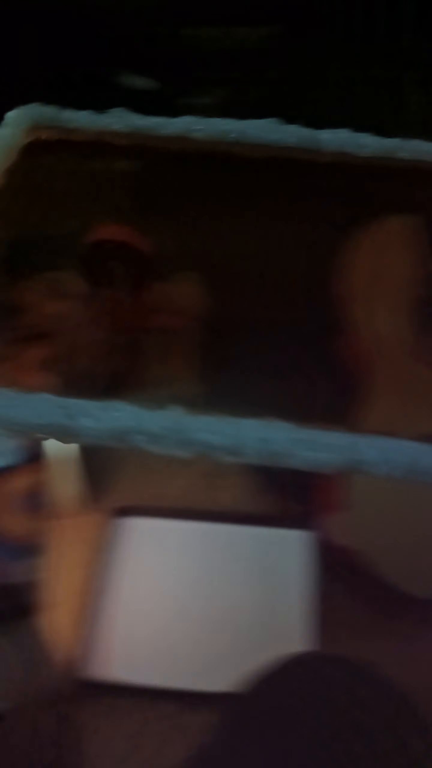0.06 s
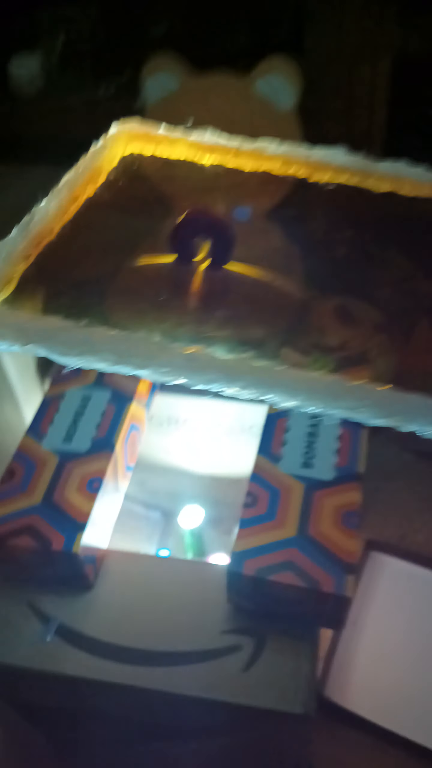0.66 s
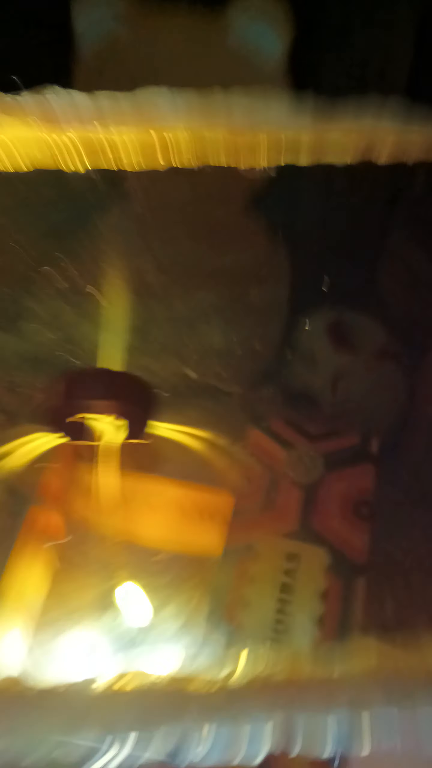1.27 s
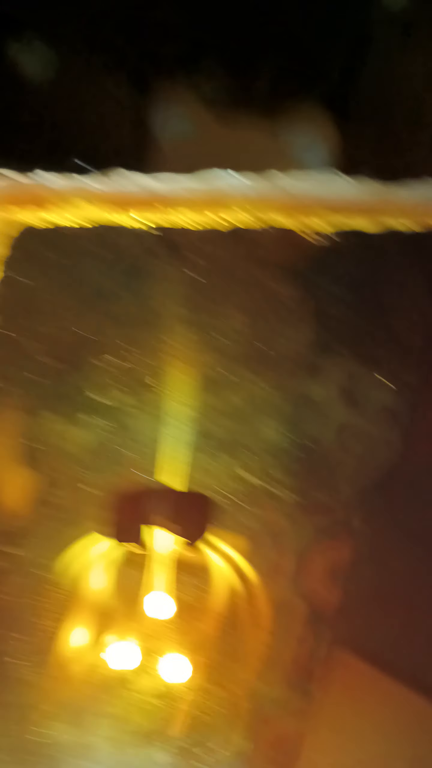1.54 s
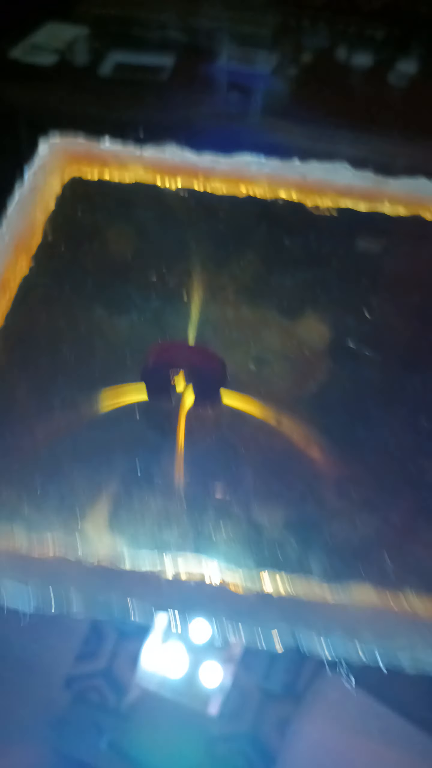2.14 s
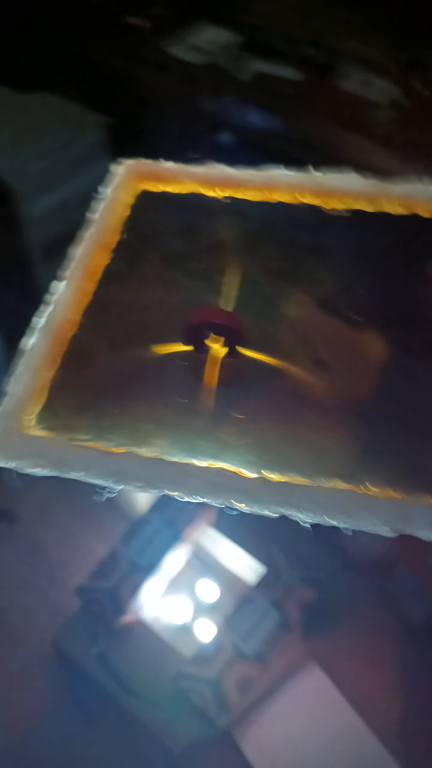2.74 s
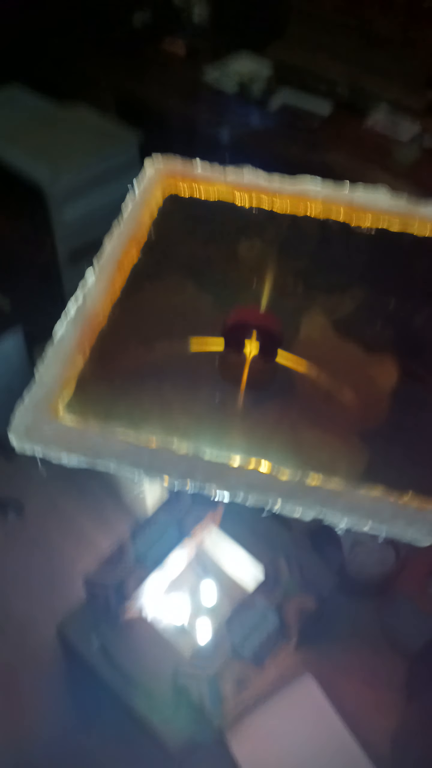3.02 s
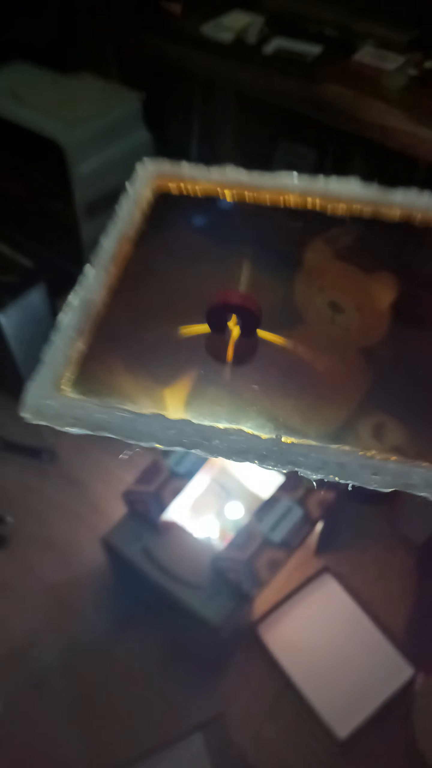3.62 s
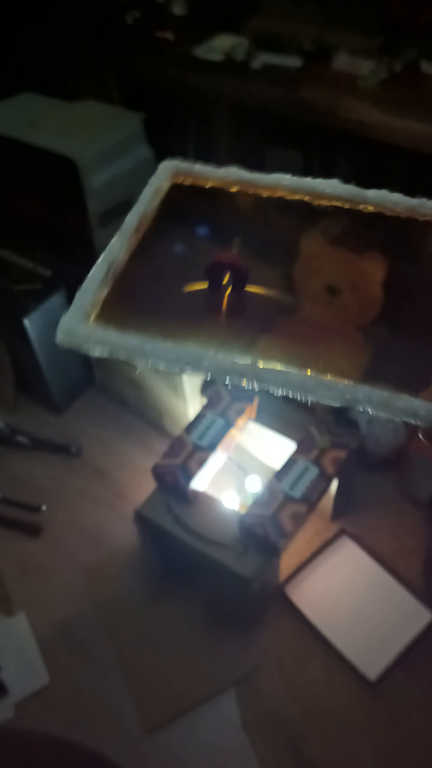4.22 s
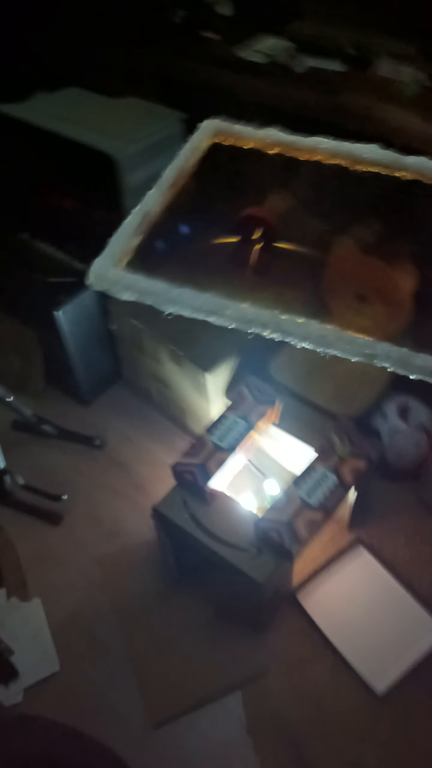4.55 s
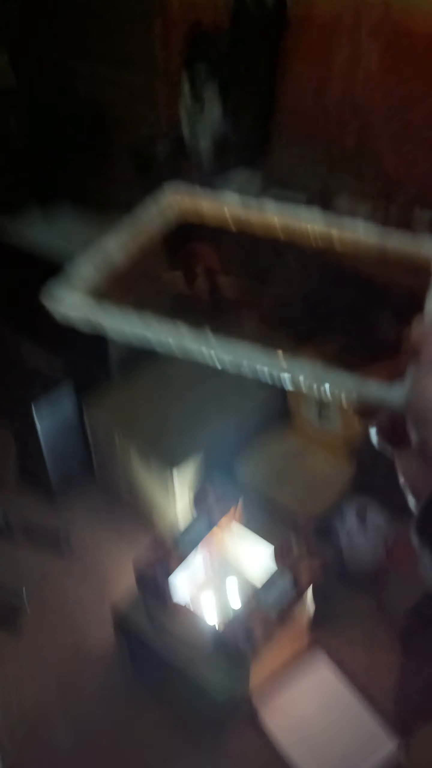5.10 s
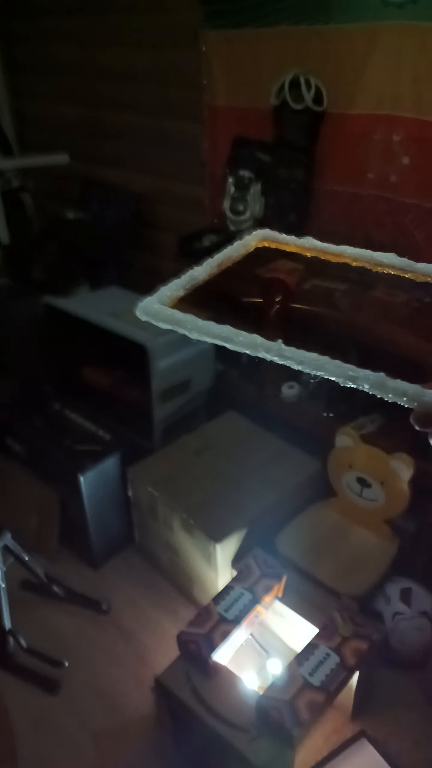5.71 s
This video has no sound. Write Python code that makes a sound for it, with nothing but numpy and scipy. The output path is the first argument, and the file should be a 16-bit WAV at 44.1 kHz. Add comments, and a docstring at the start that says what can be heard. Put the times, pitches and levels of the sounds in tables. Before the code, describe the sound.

A hand rustles over taped plastic with dry ticks, then a soft thud and a box set down hard in a quiet room.

```python
"""Faint hush of a small room at night, then a hand sliding close by over a taped plastic pane.
Tiny friction slips make its fizz, scrape and rub; the plastic snaps in dry ticks.
The floorboards thud softly. A boxy object is set down hard, rings, rocks and settles; a low hum
lingers and a few small bumps follow. The near sounds sit to the left; the room answers briefly."""
import sys
import numpy as np
from scipy import signal
from scipy.fft import rfft, irfft, next_fast_len
from scipy.io import wavfile
from scipy.ndimage import map_coordinates

SR = 44100
rng = np.random.default_rng(int(sys.argv[2]) if len(sys.argv) > 2 else 0)


def pcm_store(signal):
    """Save signal as 16-bit PCM."""
    levels = np.round(np.clip(np.atleast_2d(signal), -1, 1) * 32767)
    wavfile.write(sys.argv[1], SR, levels.astype(np.int16).T)


N = 258867
TIME_S = np.arange(N) / SR
EVENT_S = np.arange(SR * 3 // 4) / SR  # time axis of one event


def amp(db):
    """Decibels to gain."""
    return 10 ** (np.asarray(db) / 20)


def curve_at(points, hz):
    """Interpolate (freq_hz, value) points on a log frequency axis."""
    freqs_hz, values = np.transpose(points)
    return np.interp(np.log(hz + 1), np.log(freqs_hz + 1), values)


def filtered(x, response):
    """Apply response(hz) by FFT."""
    n = x.shape[-1]
    size = next_fast_len(n + 8192)
    return irfft(rfft(x, size) * response(np.fft.rfftfreq(size, 1 / SR)), size)[..., :n]


def coloured(x, spectrum):
    """Apply a minimum-phase, unit-energy filter shaped like the spectrum."""
    size = 4096
    gain_db = np.maximum(curve_at(spectrum, np.fft.rfftfreq(size, 1 / SR)), -80)
    cepstrum = irfft(np.log(amp(gain_db)))
    causal_fold = np.r_[1, np.full(size // 2 - 1, 2), 1, np.zeros(size // 2 - 1)]
    impulse = irfft(np.exp(rfft(cepstrum * causal_fold)))
    impulse /= np.linalg.norm(impulse)
    return signal.fftconvolve(x, impulse[None], axes=1)[:, :x.shape[1]]


def stereo(noise_pair, spectrum, coherence):
    """Two independent noises to a coloured, partly coherent left and right; mid rms 1."""
    def mid_side_gains(hz):
        angle = np.arccos(np.clip(curve_at(coherence, hz), -1, 1)) / 2
        return amp(curve_at(spectrum, hz)) * [np.cos(angle), np.sin(angle)]
    mid, side = filtered(noise_pair, mid_side_gains)
    return np.array([mid + side, mid - side]) / np.std(mid)


def panned(x, balance):
    """Constant-power pan by frequency."""
    def channel_gains(hz):
        left_over_right_db = curve_at(balance, hz)
        mean_power = np.cosh(np.log(amp(left_over_right_db)))
        return amp(np.outer([0.5, -0.5], left_over_right_db)) / np.sqrt(mean_power)
    return filtered(x, channel_gains)


def add(track, start_s, sound):
    """Mix a sound in at start_s."""
    part = track[:, round(start_s * SR):][:, :sound.shape[-1]]
    part += sound[..., :part.shape[-1]]


# Noise floor: freq_hz, density_db
HUSH_SPECTRUM = [(15, -54), (25, -56), (53, -8.5), (123, -1.5), (216, -5), (352, -7), (382, -8), (542, -10),
                 (587, -9.5), (749, -12.5), (881, -13), (1680, -18), (5820, -23.5), (8730, -22.5),
                 (15800, -29.5)]
# Left-right likeness of the hush: freq_hz, coherence
HUSH_COHERENCE = [(100, 0.25), (1000, 0)]
# Pan of the hush: freq_hz, left_over_right_db
HUSH_BALANCE = [(60, 12.5), (180, 3.5), (550, 1), (1650, 1.0), (4970, 1), (15000, 1)]
def room_hush():
    """Still air and microphone hiss: steady coloured noise."""
    noise = stereo(rng.standard_normal((2, N)), HUSH_SPECTRUM, HUSH_COHERENCE)
    return amp(-63) * panned(noise, HUSH_BALANCE)


# Left-right likeness of friction and room echo: freq_hz, coherence
NEAR_COHERENCE = [(100, 0.68), (300, 0.9), (700, 0.69), (1500, 0.25), (3000, 0)]
def friction(spectrum, slips_per_s, spread_db, smooth_gain):
    """Tiny slips of uneven size over smooth rubbing noise."""
    slips = (rng.random(N) < slips_per_s / SR) * rng.standard_normal((2, N))
    slips *= amp(spread_db * np.minimum(rng.exponential(size=N), 4))
    slips /= np.sqrt(np.mean(slips ** 2) + 1e-20)
    return stereo(slips + smooth_gain * rng.standard_normal((2, N)), spectrum, NEAR_COHERENCE)


# Hand strokes, relative levels: start_s, length_s, fade_s, fizz_db, scrape_db, rub_db
HAND_STROKES = [(0.599, 0.26, 0.1, -66, -71.5, -62.5), (0.811, 0.078, 0.079, -45.5, -52, -64),
                (0.901, 0.081, 0.07, -47.5, -54, -57), (1.004, 0.18, 0.22, -55.5, -63, -53.5),
                (1.203, 0.11, 0.21, -53.5, -62, -65), (1.37, 0.05, 0.17, -63, -65.5, -74),
                (1.5, 0.69, 0.2, -67, -75.5, -75), (2.137, 0.08, 0.47, -59.5, -64, -75),
                (2.22, 0.077, 0.18, -67, -53.5, -58.5), (2.42, 0.43, 0.65, -72, -77.5, -77),
                (3.352, 0.045, 0.25, -66.5, -74, -77), (3.787, 0.027, 0.14, -61.5, -61, -68),
                (3.937, 0.26, 0.13, -69.5, -70.5, -76), (4.535, 0.04, 0.12, -59.5, -70, -80),
                (4.98, 0.027, 0.18, -60.5, -73, -80)]
def stroke_envelopes(attack_s=0.025):
    """Fizz, scrape and rub gains: each stroke speeds up, holds, then falls 20 dB per fade_s."""
    power = np.zeros((3, N))
    for start_s, length_s, fade_s, *levels_db in HAND_STROKES:
        attack = np.clip((TIME_S - start_s) / attack_s, 0, 1)
        release = amp(-20 * np.maximum(TIME_S - start_s - length_s, 0) / fade_s)
        power += np.outer(amp(levels_db), attack * release) ** 2
    return np.sqrt(power)


# High, middle and low friction bands: freq_hz, density_db
FIZZ_SPECTRUM = [(2060, -17), (3500, -9.5), (4150, -10), (5830, -9), (8410, 0), (12000, -15),
                 (15100, -17.5), (15800, -15.5)]
SCRAPE_SPECTRUM = [(290, -4.5), (500, -5.5), (756, -7.5), (996, -3), (1230, -3.5), (1360, -2), (1780, -1),
                   (2260, -4), (3290, -13.5), (4500, -19), (5850, -10), (9900, -120)]
RUB_SPECTRUM = [(71, -27), (120, -4), (216, -9), (270, 0.5), (470, -12.5), (800, -17.5), (1040, -21),
                (1760, -120)]
def sliding_hand(flutter_hz=45, flutter_db=0.46):
    """Skin and sleeve slide over the pane; the pressure flutters."""
    fizz_gain, scrape_gain, rub_gain = stroke_envelopes()
    fizz = amp(0.6) * friction(FIZZ_SPECTRUM, slips_per_s=2500, spread_db=1.5, smooth_gain=2.0)
    scrape = amp(0.56) * friction(SCRAPE_SPECTRUM, slips_per_s=700, spread_db=2.5, smooth_gain=1.0)
    rub = amp(-1.5) * friction(RUB_SPECTRUM, slips_per_s=1100, spread_db=0, smooth_gain=2.3)
    knots = rng.standard_normal(int(N * flutter_hz / SR) + 4)
    flutter = map_coordinates(knots, [TIME_S * flutter_hz])
    return (fizz_gain * fizz + scrape_gain * scrape + rub_gain * rub) * amp(flutter_db * flutter)


# Room decay: freq_hz, t60_s
ROOM_DECAY = [(80, 0.53), (300, 0.26), (1000, 0.28), (3500, 0.3), (10000, 0.45)]
def room_tail():
    """Diffuse echo: fresh stereo noise, each frequency dying at its own rate."""
    noise = stereo(rng.standard_normal((2, len(EVENT_S))), [(1, 0)], NEAR_COHERENCE)
    hz, time_s, bins = signal.stft(noise, SR, nperseg=256)
    decay = amp(-60 * time_s / curve_at(ROOM_DECAY, hz)[:, None])
    _, tail = signal.istft(bins * decay, SR, nperseg=256)
    return tail[:, :len(EVENT_S)]


# Bright snap and duller body of a tick: freq_hz, density_db
SNAP_SPECTRUM = [(1760, -37), (3000, -12.5), (3870, -13.5), (4170, -8.5), (5200, -8.5), (5760, -10.5),
                 (8530, -2.5), (13300, -22), (15500, -25)]
SNAP_BODY_SPECTRUM = [(88, -25), (150, -5.5), (1030, 2), (1880, -1), (2440, -6), (3210, -10), (3490, 0.5),
                      (4000, -11), (5200, -53), (8800, -120)]
# Ticks, relative levels: start_s, level_db, body_db, t60_s
PLASTIC_TICKS = [(0.6399, -29, 3, 0.016), (0.6427, -38, 12.5, 0.014), (0.7196, -30.5, -11, 0.025),
                 (0.734, -42, 4, 0.019), (0.8147, -33, -15, 0.023), (1.262, -34.5, 0, 0.0097),
                 (1.393, -41.5, -6, 0.027), (1.4811, -28, -40, 0.003), (1.5265, -46, -15, 0.006),
                 (1.5515, -42, -15, 0.007), (2.997, -57, 10, 0.026), (3.842, -50, 7, 0.012),
                 (3.98, -55, 11, 0.025), (4.052, -52, 9, 0.021), (4.459, -42.5, 7, 0.039),
                 (4.6409, -37, -30, 0.02)]
def plastic_ticks(usual_t60_s=0.015):
    """The plastic snaps in brief noise bursts; longer cracks stir the room more."""
    track = np.zeros((2, N))
    for start_s, level_db, body_db, t60_s in PLASTIC_TICKS:
        crack = amp(-60 * EVENT_S / t60_s) * rng.standard_normal((2, len(EVENT_S)))
        echo = amp(-23.5) * (t60_s / usual_t60_s) ** 2 * room_tail()
        snap = coloured(crack + echo, SNAP_SPECTRUM)
        body = amp(body_db - 3.5) * coloured(crack + echo, SNAP_BODY_SPECTRUM)
        add(track, start_s, amp(level_db - 5.5) * (snap + body))
    return track


def ringing(modes, scatter_db):
    """Damped sine modes; their strengths vary from event to event."""
    pitch_hz, level_db, t60_s = np.transpose(modes)[:, :, None]
    varied_db = level_db + scatter_db * rng.standard_normal(level_db.shape)
    envelopes = amp(varied_db - 60 * EVENT_S / t60_s)
    return np.sum(envelopes * np.sin(2 * np.pi * pitch_hz * EVENT_S), axis=0)


def softened(x, cutoff_hz):
    """Low-pass: the softer the sound, the less treble it keeps."""
    return signal.lfilter(*signal.butter(2, cutoff_hz, fs=SR), x)


def board_flex(pitch_hz, swell_s):
    """The boards give way and spring back: a low tone that swells and dies."""
    progress = EVENT_S / swell_s
    envelope = progress ** 3 * np.exp(3 - 3 * progress)
    return -np.sin(2 * np.pi * pitch_hz * EVENT_S) * envelope


# Floorboard modes: pitch_hz, level_db, t60_s
BOARD_MODES = [(58.5, -13, 0.24), (130, -11, 0.38), (218, -12, 0.1), (280, -3, 0.14), (334, -10, 0.094),
               (404, -1.5, 0.036), (647, -14, 0.075), (835, -14, 0.043)]
# The floor as the room returns it: freq_hz, density_db
FLOOR_SPECTRUM = [(40, -15), (100, -1), (300, -1.5), (450, -4), (700, -12), (1200, -15.5), (3000, -47)]
# Soft thuds and bumps, relative levels: start_s, level_db, cutoff_hz
# The row at 4.736 s is the low hum lingering after the box settles.
FLOOR_SOUNDS = [(2.155, -53, 450), (2.399, -45, 200), (2.433, -33, 700), (2.4436, -34.5, 520),
                (2.456, -39.5, 450), (2.474, -37, 280), (2.508, -44.5, 220), (2.585, -48, 200),
                (3.445, -48, 360), (4.736, -44, 144), (4.949, -36.5, 262), (5.053, -40.5, 320),
                (5.245, -44, 192), (5.382, -54, 130)]
def floorboards(flex_db_per_db=0.41):
    """The boards ring in their low modes and barely stir the room; even faint sounds carry a low tone."""
    track = np.zeros((2, N))
    for start_s, level_db, cutoff_hz in FLOOR_SOUNDS:
        pulse = coloured(amp(11) * (EVENT_S == 0) + amp(-15) * room_tail(), FLOOR_SPECTRUM)
        ring = amp(-6) * ringing(BOARD_MODES, scatter_db=1.5)
        low_tone = amp(-32.5 + flex_db_per_db * level_db) * board_flex(pitch_hz=95.3, swell_s=0.011)
        add(track, start_s, amp(level_db) * softened(pulse + ring, cutoff_hz) + low_tone)
    return track


# Modes of the whole box and of its struck wall: pitch_hz, level_db, t60_s
BOX_MODES = [(95, -12, .36), (146, -16, .25), (203, -4.5, .33), (275, -9, .22), (345, -13, .3),
             (427, -15, .25), (490, -16, .3), (573, -18, .3), (630, -21, .25), (838, -10.5, .22),
             (960, -11, .15), (1187, -22, .25), (2005, -23, .25), (2280, -24, .22), (2645, -27, .2)]
BOX_WALL_MODES = [(302, -10, 0.042), (826, -3.5, 0.027), (1000, -10, .02)]
# A contact as the room returns it: freq_hz, density_db
CLATTER_SPECTRUM = [(150, -20), (260, -4), (650, -6), (783, -7.5), (853, -6), (1260, -12.5), (1490, -9.5),
                    (2320, -16), (2530, -17.5), (2750, -16), (3930, -17.5), (8010, -28.5), (15000, -50)]
# Landing, rocking, settling, relative levels: start_s, level_db, hardness_hz, push_db
BOX_CONTACTS = [(4.456, -28, 350, -2), (4.4664, -15.5, 4800, -12), (4.4692, -21.5, 1500, -18),
                (4.5014, -24, 900, 5), (4.554, -28.5, 503, 9), (4.582, -25.5, 600, 1),
                (4.589, -23, 1120, -18), (4.595, -33, 350, 16), (4.603, -34.5, 2800, -8),
                (4.635, -44, 450, 12)]
def box_set_down(crack_knee_hz=800):
    """Each contact rings the box, pushes the boards and fills the room; harder ones crack more."""
    track = np.zeros((2, N))
    for start_s, level_db, hardness_hz, push_db in BOX_CONTACTS:
        crack_gain = amp(6) / (1 + (crack_knee_hz / hardness_hz) ** 2)
        clatter = coloured(crack_gain * (EVENT_S == 0) + amp(-12) * room_tail(), CLATTER_SPECTRUM)
        ring = amp(-5) * ringing(BOX_MODES, scatter_db=0.8)
        clack = crack_gain * amp(-7) * ringing(BOX_WALL_MODES, scatter_db=0.8)
        strike = softened(clatter + ring + clack, hardness_hz)
        push = amp(push_db - 3) * board_flex(pitch_hz=104, swell_s=0.0078)
        add(track, start_s, amp(level_db) * (strike + push))
    return track


# Pan of the near sounds: freq_hz, left_over_right_db
NEAR_BALANCE = [(60, 17), (110, 3), (200, 5), (380, 1), (700, 6.5), (1300, 7.5), (2400, 12.5), (4400, 15),
                (8100, 9), (15000, 2.5)]
def scene(left_lag_s=0.00013):
    """Near sounds, louder and slightly later on the left, over the steady hush."""
    near = panned(sliding_hand() + plastic_ticks() + floorboards() + box_set_down(), NEAR_BALANCE)
    lagged = filtered(near, lambda hz: np.exp(np.pi * left_lag_s * np.outer([-1j, 1j], hz)))
    return room_hush() + lagged


def record(dry):
    """The microphones shed the deep bass and keep nothing above the band limit."""
    bass_hz, top_hz = 48, 15850
    bass_cut = signal.butter(8, bass_hz, "high", fs=SR, output="sos")
    return filtered(signal.sosfilt(bass_cut, dry), lambda hz: hz < top_hz)


dry = scene()
out = record(dry)
pcm_store(out)
```